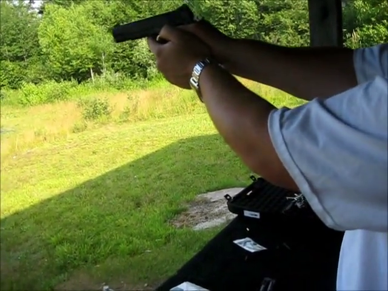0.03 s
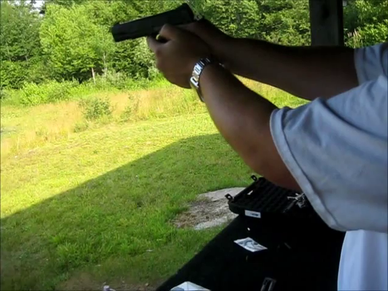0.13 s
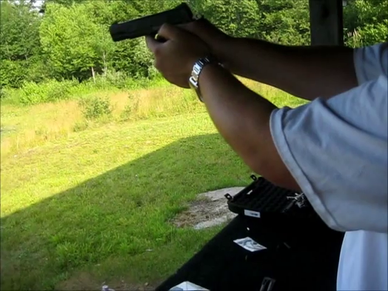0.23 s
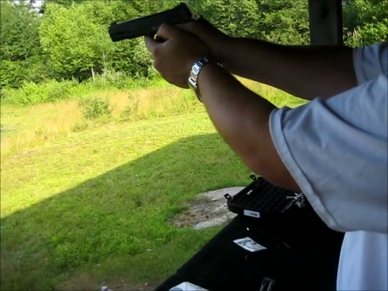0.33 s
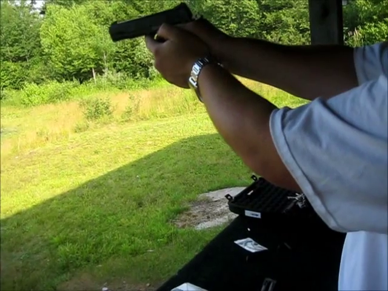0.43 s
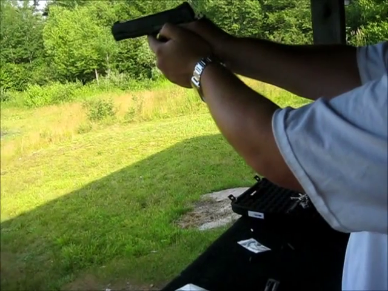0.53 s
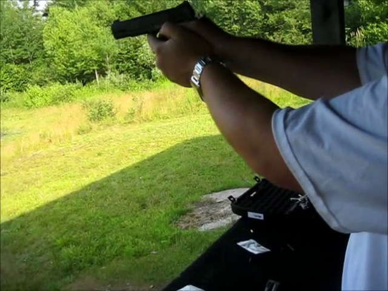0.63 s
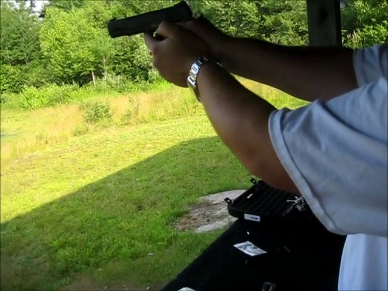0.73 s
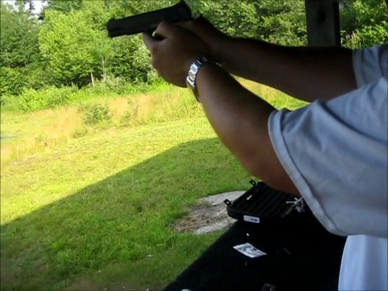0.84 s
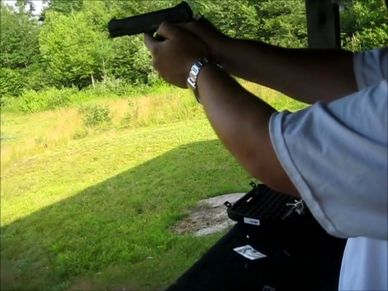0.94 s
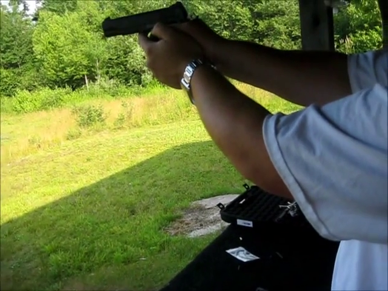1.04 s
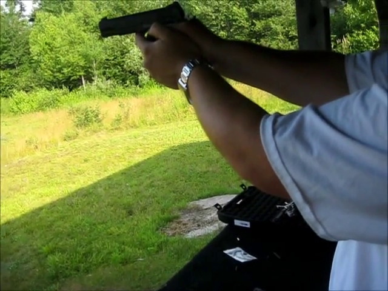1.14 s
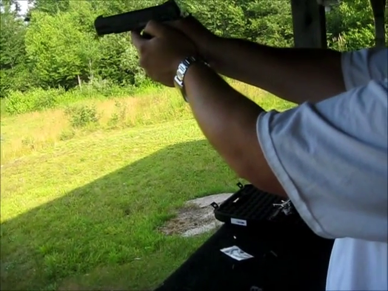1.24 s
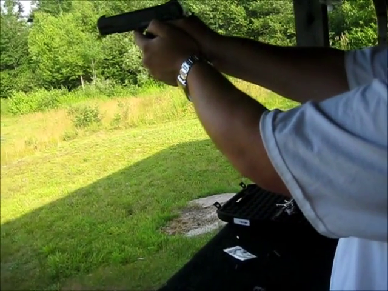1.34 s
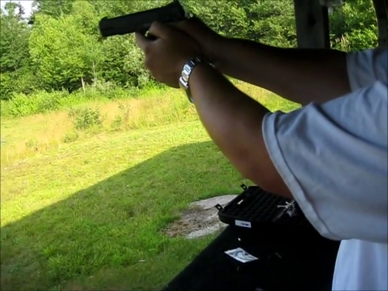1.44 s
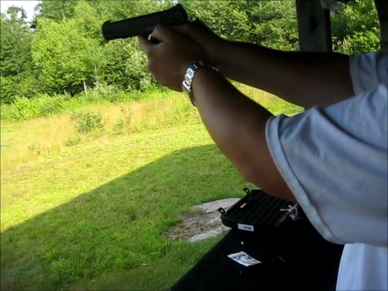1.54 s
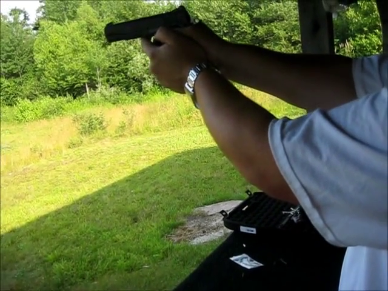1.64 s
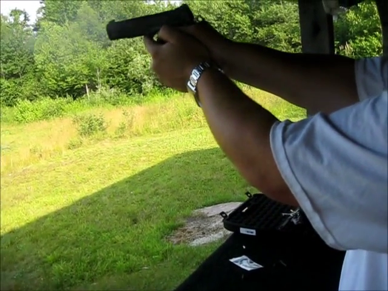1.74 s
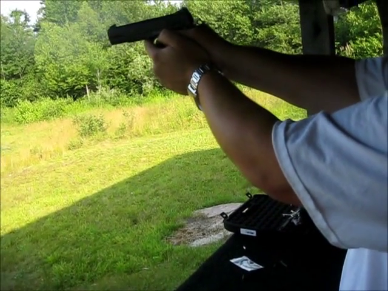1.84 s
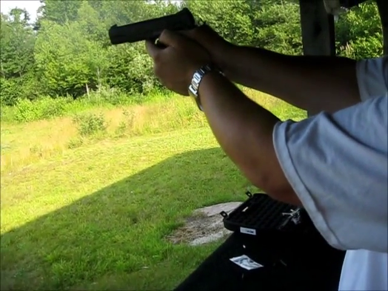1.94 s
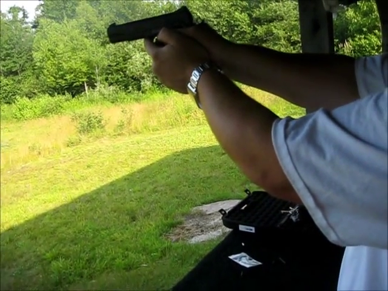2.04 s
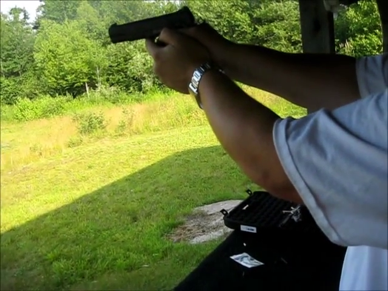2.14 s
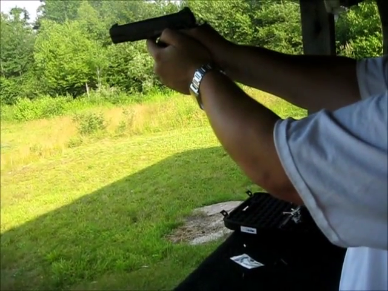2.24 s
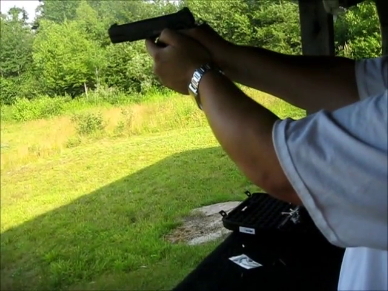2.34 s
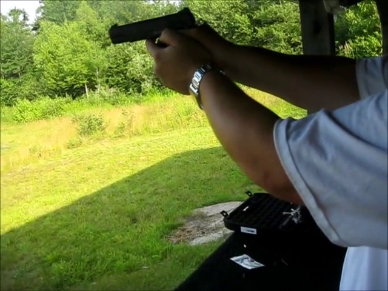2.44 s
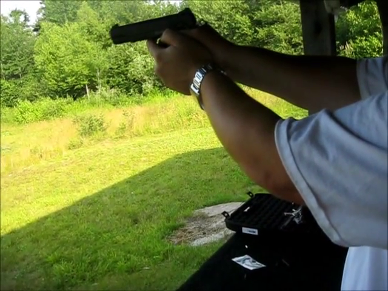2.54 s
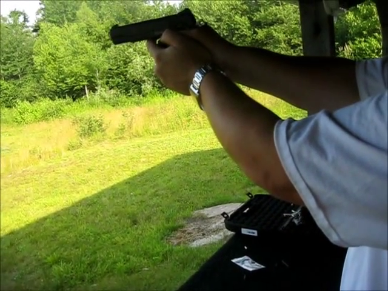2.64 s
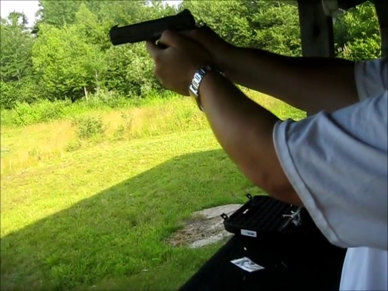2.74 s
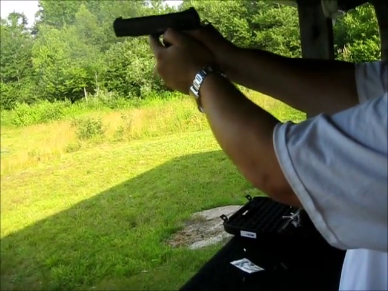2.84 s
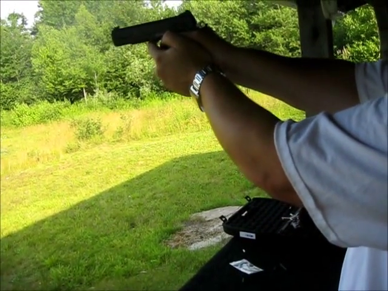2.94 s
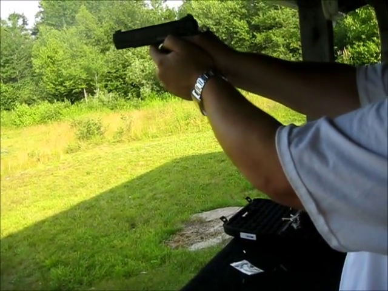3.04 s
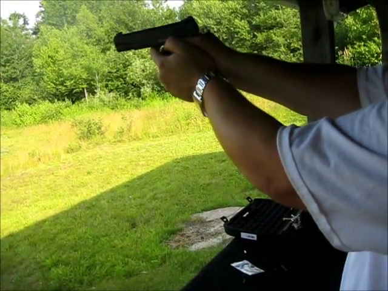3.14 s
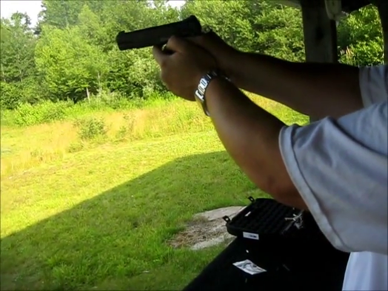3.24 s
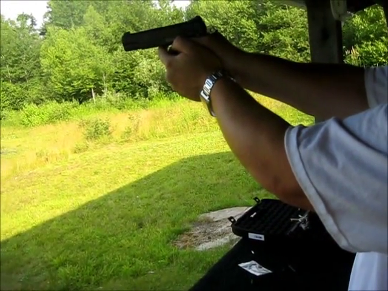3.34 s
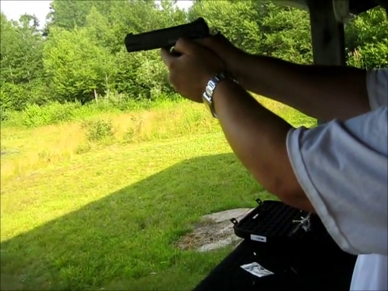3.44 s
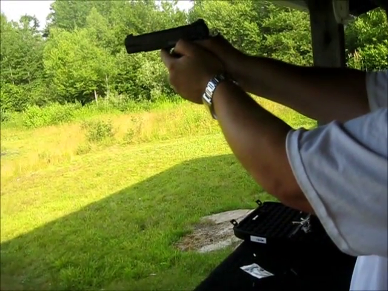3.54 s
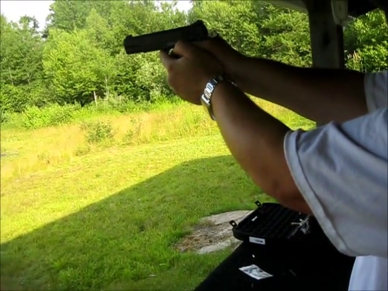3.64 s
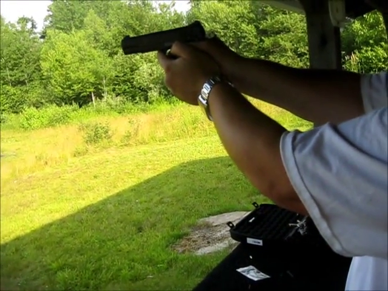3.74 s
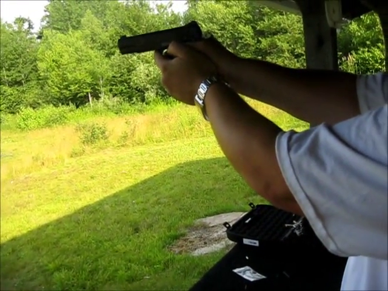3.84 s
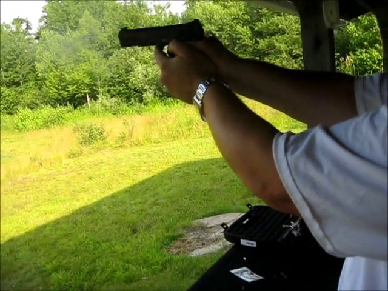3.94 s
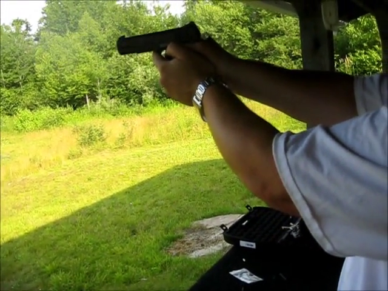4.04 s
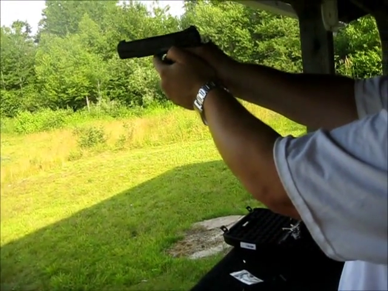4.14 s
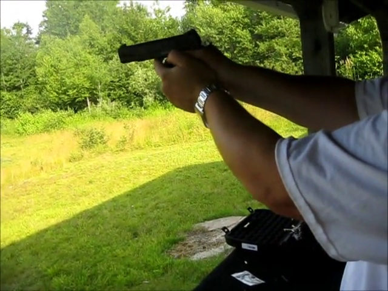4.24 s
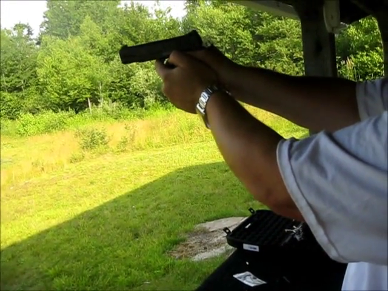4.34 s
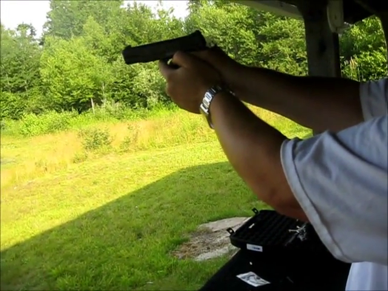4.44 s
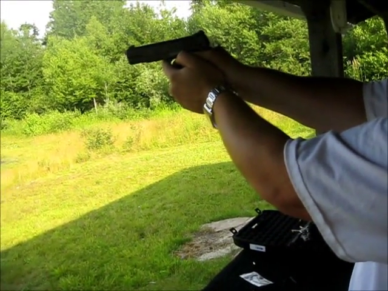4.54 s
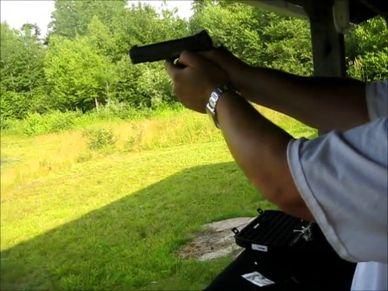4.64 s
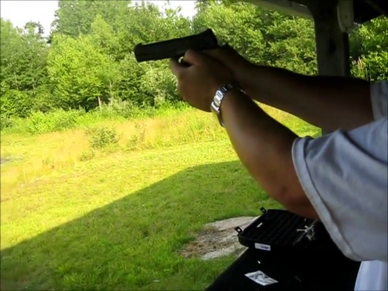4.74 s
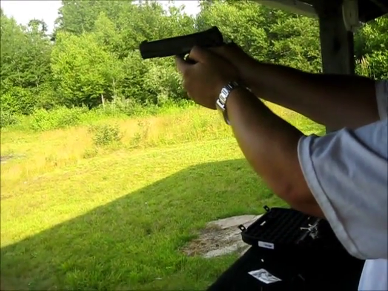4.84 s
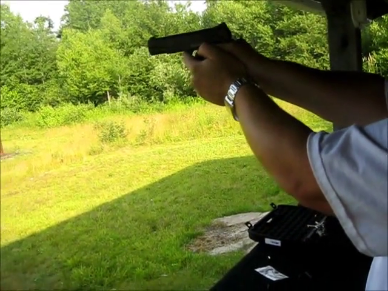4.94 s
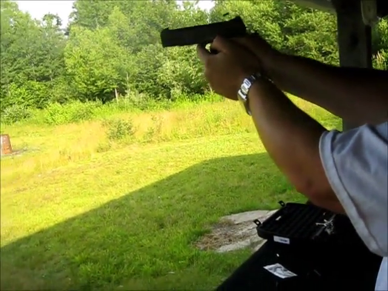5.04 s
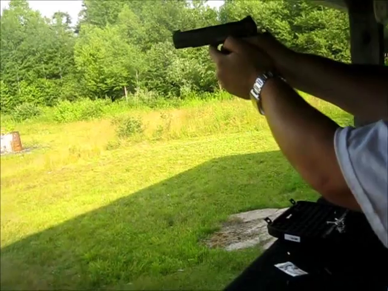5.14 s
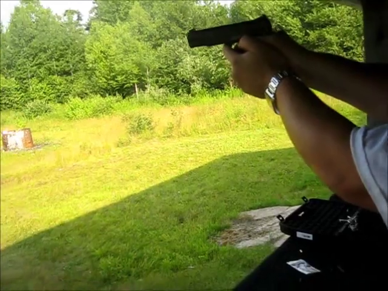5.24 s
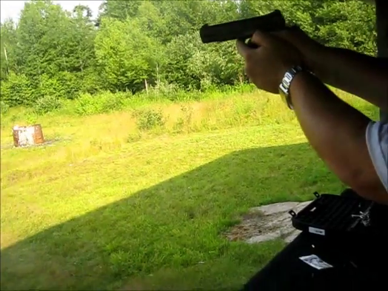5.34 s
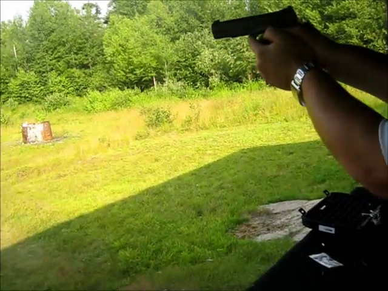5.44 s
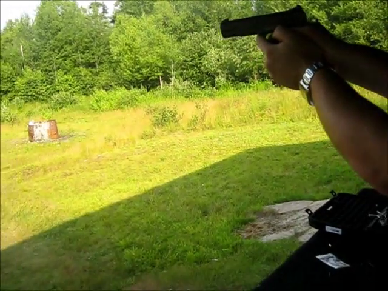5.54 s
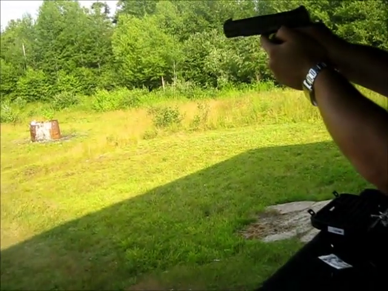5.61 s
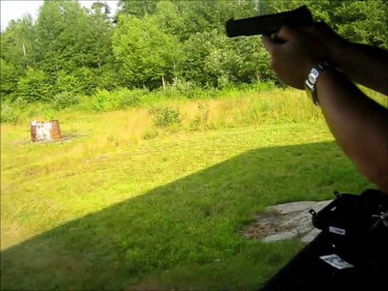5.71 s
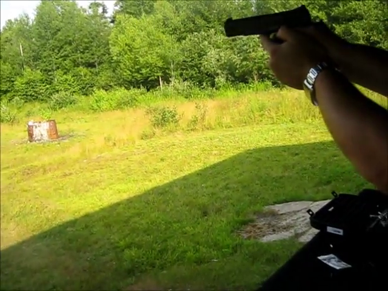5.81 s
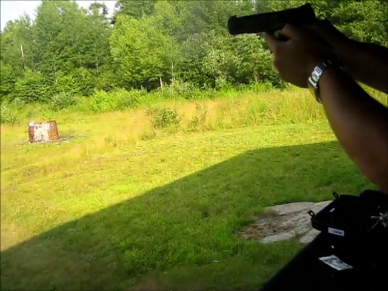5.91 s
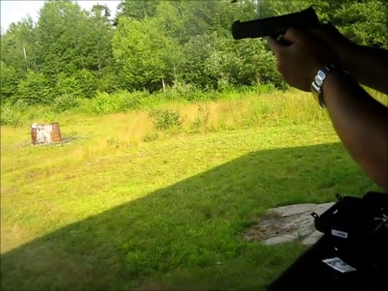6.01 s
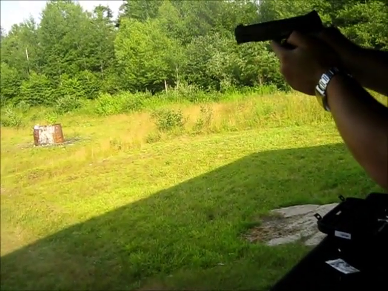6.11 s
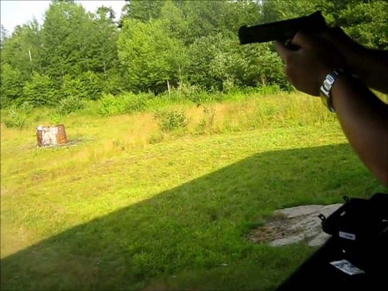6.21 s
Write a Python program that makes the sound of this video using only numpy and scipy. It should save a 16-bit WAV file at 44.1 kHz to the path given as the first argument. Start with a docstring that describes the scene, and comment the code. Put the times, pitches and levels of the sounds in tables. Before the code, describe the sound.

A small pistol fires five evenly paced shots close by outdoors, with a rolling echo, trigger clicks and tinkling shell casings.

```python
"""A small pistol fires five shots under the roof of a range shelter, close to a camera microphone.
Each crack fills the shelter and sets a panel humming; the camera's gain control ducks, and the echo
of the woods beyond swells as it recovers. The trigger and hammer click just before each shot.
Between shots spent brass cases land on the floor, bounce and ring, over a faint outdoor hiss."""
import sys
import numpy as np
from scipy import signal
from scipy.fft import rfft, irfft, next_fast_len
from scipy.io import wavfile
from scipy.ndimage import uniform_filter1d

SR = 44100
rng = np.random.default_rng(int(sys.argv[2]) if len(sys.argv) > 2 else 0)


def generate_wav(sig):
    """Save sig (samples, or channels by samples) to the path in sys.argv[1] as 16-bit PCM at SR."""
    pcm = np.round(np.clip(np.atleast_2d(sig).T, -1, 1) * 32767).astype(np.int16)
    wavfile.write(sys.argv[1], SR, pcm)


N = 276507


def amp(db):
    """Decibels to amplitude."""
    return 10 ** (np.asarray(db) / 20)


def unit_rms(x):
    """Scales to an rms of one."""
    return x / np.sqrt(np.mean(x ** 2) + 1e-20)


def clock(seconds):
    """Sample times of a sound of that length."""
    return np.arange(round(seconds * SR)) / SR


def decay(t, t60):
    """Exponential fall of 60 dB in t60 seconds."""
    return np.exp(-np.log(1000) * t / t60)


def add(mix, start_s, sound):
    """Lays a sound into the mix."""
    part = mix[round(start_s * SR):][:len(sound)]
    part += sound[:len(part)]


def spectrum_db(spectrum, hz):
    """Reads a spectrum table along a logarithmic frequency axis."""
    table_hz, db = np.transpose(spectrum)
    return np.interp(np.log(hz + 1), np.log(table_hz + 1), db)


def coloured(x, spectrum, peaks=()):
    """Gives x a spectrum, with resonance peaks on top, at an rms of one."""
    size = next_fast_len(len(x))
    hz = np.fft.rfftfreq(size, 1 / SR)
    peaks_db = sum(lift / (1 + (2 * (hz - centre) / width) ** 2) for centre, width, lift in peaks)
    gain = amp(spectrum_db(spectrum, hz) + peaks_db)
    return unit_rms(irfft(rfft(x, size) * gain, size)[:len(x)])


def band_noise(t, hz, width_hz):
    """Noise in one resonance."""
    b, a = signal.iirpeak(hz, hz / width_hz, SR)
    return unit_rms(signal.lfilter(b, a, rng.standard_normal(len(t))))


def stirred(paths, steady_below_hz):
    """The same echo paths answer every shot; moving air reshuffles the short waves."""
    kept = 1 / (1 + (np.fft.rfftfreq(len(paths), 1 / SR) / steady_below_hz) ** 2)
    fresh = rfft(rng.standard_normal(len(paths)))
    return irfft(kept * rfft(paths) + np.sqrt(1 - kept ** 2) * fresh, len(paths))


# Open air around the shelter: frequency_hz, relative_db
AIR_SPECTRUM = [(15, -37), (25, -16.5), (129, -7), (233, -6.5), (509, -5), (552, -5), (684, -4.5),
                (782, -3.5), (1800, -7.5), (2360, -8.5), (5730, -11), (7910, -18.5), (9300, -18),
                (15500, -24.5)]
def outdoor_air(level_db=-49.5):
    """A faint, steady hiss behind everything."""
    return amp(level_db) * coloured(rng.standard_normal(N), AIR_SPECTRUM)


# Cases striking the shelter floor: start_s, level_db
CASE_LANDINGS = [(2.134, -34), (2.362, -45.5), (3.33, -29), (3.347, -30), (4.431, -31), (4.446, -32),
                 (5.157, -32.5), (5.5, -24.5), (5.7512, -25.5)]
def case_landings(mix):
    """Each landing is a bright tick of brass, with a short tail under the roof."""
    t = clock(.2)
    tick_hz_db = [(1000, -35.5), (4000, -17.5), (5800, 13), (7500, 0.5), (12000, 3.5), (16000, -9)]
    onset = np.minimum(t / 0.00086, 1)
    envelope = onset * (decay(t, t60=0.0412) + amp(-12) * decay(t, t60=0.533))
    for start_s, level_db in CASE_LANDINGS:
        tick = coloured(rng.standard_normal(len(t)), tick_hz_db)
        add(mix, start_s, amp(level_db) * tick * envelope)


def case_ring(wall_hz, wall_db, cavity_hz, cavity_db):
    """The thin wall rings in a beating pair of modes; the air inside gives a short, breathy note."""
    t = clock(0.38)
    beat_hz = rng.uniform(19.8, 60.3)
    modes = np.sin(2 * np.pi * wall_hz * t) + 0.66 * np.sin(2 * np.pi * (wall_hz + beat_hz) * t)
    wall = unit_rms(modes + .6 * band_noise(t, wall_hz, width_hz=89)) * decay(t, t60=0.191)
    cavity = band_noise(t, cavity_hz, width_hz=290) * decay(t, t60=0.147)
    onset = np.minimum(t / 0.0066, 1)
    return (amp(wall_db) * wall + amp(cavity_db) * cavity) * onset


# The wall note of each case on the floor: from_s, pitch_hz
CASE_PITCHES = [(2.3, 12220), (4.2, 12500), (5.3, 12470)]
# Knocks that set a case bouncing: start_s, wall_db, cavity_db, cavity_hz, first_flight_s
CASE_KNOCKS = [(2.360, -38.5, -23.5, 5810, 0.1795), (2.735, -42.5, -34, 5590, .1),
               (4.290, -43, -55, 5600, 0.236), (4.555, -37.5, -48.5, 5460, .08),
               (5.347, -37.5, -48.5, 5613, .155), (5.75, -31, -49.5, 5600, 0.13)]
def bouncing_cases(mix, wall_loss_db=9, cavity_loss_db=16, cavity_sag=0.062, flight_share=.67):
    """A case rings at four touches of the floor; each hop is shorter and softer, its air note lower."""
    for start_s, wall_db, cavity_db, cavity_hz, first_flight_s in CASE_KNOCKS:
        wall_hz = [hz for from_s, hz in CASE_PITCHES if from_s <= start_s][-1]
        touch_s = start_s
        for hop in range(4):
            spent = np.sqrt(hop)  # the first bounce loses most
            ring = case_ring(wall_hz, wall_db - spent * wall_loss_db,
                             cavity_hz * (1 - cavity_sag) ** hop, cavity_db - spent * cavity_loss_db)
            add(mix, touch_s, ring)
            touch_s += first_flight_s * flight_share ** hop


def steel_click(level_db, body_db):
    """Small steel parts snap together; body_db sets the frame's ring against the bright snap."""
    t = clock(.08)
    snap = band_noise(t, hz=11000, width_hz=9800) * decay(t, t60=0.0485)
    body = band_noise(t, hz=2210, width_hz=350) + 0.51 * band_noise(t, hz=4600, width_hz=1900)
    share = amp(body_db) / 2
    return amp(level_db) * (snap + share * body * decay(t, t60=0.0417)) / np.hypot(1, share)


# The trigger, close to the microphone: start_s, take_up_db, release_db, body_db
TRIGGER_PULLS = [(1.618, -62, -32, 10.5), (2.7535, -44, -39.5, -9.5), (3.859, -39.5, -37, 2.5),
                 (4.888, -45.5, -44.5, -10), (5.8095, -43.5, -35, 14)]
def trigger_pulls(mix, release_lag_s=.0168):
    """Each pull clicks twice: the take-up, then the release."""
    for start_s, take_up_db, release_db, body_db in TRIGGER_PULLS:
        add(mix, start_s, steel_click(take_up_db, body_db))
        add(mix, start_s + release_lag_s, steel_click(release_db, body_db))


# Clumps of trunks out in the woods, louder than the diffuse echo: delay_s, lift_db, spread_s
TRUNK_CLUMPS = [(0.249, 4, 0.0054), (0.304, 4.5, 0.00226), (.415, 4, 0.0155), (0.479, 3.5, .003),
                (.564, 1.5, .0016), (0.605, 8, 0.00193), (0.683, 5, 0.00306)]
def trees():
    """A dense thicket of paths back to the microphone, in which a few clumps stand out."""
    t = clock(2)
    lift_db = sum(db * np.exp(-.5 * ((t - delay) / spread) ** 2) for delay, db, spread in TRUNK_CLUMPS)
    return rng.standard_normal(len(t)) * amp(lift_db)


# Colour of the nearest trees: frequency_hz, relative_db
NEAR_TREES_SPECTRUM = [(50, -28), (180, -30.5), (340, -20), (450, -9), (650, -7), (830, 0.5), (1070, 2),
                       (1300, -2), (1650, -6.5), (3200, -4.5), (5500, -10), (7200, -14), (10500, -18.5),
                       (15500, -26)]
# What air and foliage do to a distant echo for every far_s of travel: frequency_hz, gain_db
FOLIAGE_LOSS = [(100, -19.5), (330, -2.5), (500, 3), (950, 1.5), (1350, -6), (2200, -8.5), (3200, -18.5),
                (5500, -22.5), (10000, -33.5), (15500, -46)]
def woods_echo(paths, deep_db=-14, far_s=0.88, swell_s=0.3926, fade_from_s=0.5592,
               treeline_db=-24, treeline_s=0.293, spread_s=0.0374, surge_db=1.07, surge_s=0.03004):
    """Countless trees scatter the shot; the farther they stand, the later and duller their answer."""
    scattered = coloured(stirred(paths, steady_below_hz=2700), NEAR_TREES_SPECTRUM)
    hz, t, bands = signal.stft(scattered, SR, nperseg=512)
    swell = np.minimum(t / swell_s, 1) ** 0.446  # the shot reaches more and more trees
    fade = decay(np.maximum(t - fade_from_s, 0), t60=2.016)
    travel_db = spectrum_db(FOLIAGE_LOSS, hz)[:, None] * t / far_s
    deep_woods = amp(deep_db + travel_db) * swell * fade
    # The open edge of the woods answers early and undulled.
    treeline = amp(treeline_db) * np.exp(-.5 * ((t - treeline_s) / spread_s) ** 2)
    surges = amp(surge_db * np.interp(t / surge_s, np.arange(len(t)), rng.standard_normal(len(t))))
    return signal.istft(bands * np.hypot(deep_woods, treeline) * surges, SR, nperseg=512)[1]


def panel_hum(pitch_hz=298, level_db=-24, rattle=0.362):
    """A panel of the shelter hums on unevenly after the blast."""
    t = clock(0.92)
    hum = np.sin(2 * np.pi * pitch_hz * t) + rattle * band_noise(t, pitch_hz, width_hz=9)
    return amp(level_db) * hum * decay(t, t60=0.824)


# The blast thrown around under the roof: frequency_hz, relative_db
BLAST_SPECTRUM = [(40, -35.5), (100, -31), (200, -14.5), (400, -9), (620, -5.5), (1350, -3), (1950, -9.5),
                  (3600, -5), (5900, -13), (7900, -18.5), (10000, -17.5), (15500, -23)]
# Resonances of the shelter around the microphone: pitch_hz, width_hz, lift_db
SHELTER_MODES = [(566.3, 43, 5), (721.5, 109, 4), (1011, 145, 3.5), (1160, 21, -3), (1389, 67, 2),
                 (1762, 82, 9), (2506, 257, 5), (2640, 43, 4), (2720, 41, -1), (3070, 37, 1),
                 (3570, 205, 3.5), (3810, 113, 0.5), (4210, 60, -3), (4197, 50, 4), (4600, 41, -8.5),
                 (5480, 61, 5.5), (6004, 144, 6)]
def shelter_reverb(paths, arrival_s=0.005254, early_db=18, late_db=11):
    """Roof and bench return the blast a moment later; it dies fast through the open sides."""
    t = np.arange(len(paths)) / SR
    age = np.maximum(t - arrival_s, 0)
    onset = np.minimum(t / arrival_s, 1) ** 3
    level = np.hypot(amp(early_db) * decay(age, t60=0.069), amp(late_db) * decay(age, t60=0.1787))
    blast = coloured(stirred(paths, steady_below_hz=4680), BLAST_SPECTRUM, SHELTER_MODES)
    return blast * level * onset


def gas_thump(gain_db, push_s):
    """The muzzle gas pushes, then sucks back."""
    age = clock(.1) / push_s
    return amp(gain_db) * (1 - age) * np.exp(-age) * (1 - np.exp(-4 * age))


# The report, straight from muzzle to microphone: frequency_hz, relative_db
CRACK_SPECTRUM = [(40, -37), (150, 1), (500, -14.5), (1000, 3), (2500, 4.5), (6000, 4), (9000, 0),
                  (11300, 3.5), (13500, -1.5), (16000, -2)]
def muzzle_crack(level_db=14.5, hold_s=0.00435):
    """A few milliseconds of harsh, bright noise."""
    t = clock(.1)
    envelope = decay(np.maximum(t - hold_s, 0), t60=0.031)
    return amp(level_db) * coloured(rng.standard_normal(len(t)), CRACK_SPECTRUM) * envelope


# The pistol under the roof, at close range: start_s, blast_gain_db, thump_gain_db, push_s
PISTOL_SHOTS = [(1.6686, 0, -9, 0.00046), (2.803, 0, 13, 0.001125), (3.9077, -0.5, 11, 0.00266),
                (4.9776, -0.5, 16, 0.00104), (5.8396, 0, -2, 0.00054)]
def pistol_shots(mix, hammer_lead_s=0.0093):
    """The hammer falls, the muzzle cracks and thumps, and the shelter and woods answer."""
    shelter_paths, tree_paths = rng.standard_normal(SR // 2), trees()
    for start_s, blast_gain_db, thump_gain_db, push_s in PISTOL_SHOTS:
        add(mix, start_s - hammer_lead_s, steel_click(level_db=-30.5, body_db=1.5))
        for part in muzzle_crack(), shelter_reverb(shelter_paths), panel_hum(), woods_echo(tree_paths):
            add(mix, start_s, amp(blast_gain_db) * part)
        add(mix, start_s, gas_thump(thump_gain_db, push_s))


def scene():
    """Five shots with their echoes, the small metal sounds and the outdoor hiss, in mono."""
    mix = outdoor_air()
    pistol_shots(mix)
    trigger_pulls(mix)
    case_landings(mix)
    bouncing_cases(mix)
    return mix[None]


def gain_control(x, threshold_db=-8, cut_share=0.8623, recovery_db_per_s=95):
    """The camera's gain drops at once on a loud sound and creeps back."""
    power_db = 10 * np.log10(abs(uniform_filter1d(x ** 2, size=280)) + 1e-12)
    cut_db = cut_share * np.maximum(power_db - threshold_db, 0)
    recovered_db = np.arange(N) / SR * recovery_db_per_s
    held_cut_db = np.maximum.accumulate(cut_db + recovered_db) - recovered_db
    return x / amp(uniform_filter1d(held_cut_db, size=40))


def record(dry, notch_hz=7930, notch_width_hz=1300, band_limit_hz=16050):
    """Gain control, a notch in the treble, clipping at full scale and a band limit."""
    notch = signal.iirnotch(notch_hz, notch_hz / notch_width_hz, SR)
    notched = signal.lfilter(*notch, gain_control(dry[0]))
    low_pass = signal.firwin(401, band_limit_hz, window=("kaiser", 8), fs=SR)
    return signal.oaconvolve(np.clip(notched, -1, 1), low_pass, "same")[None]


dry = scene()
out = record(dry)
generate_wav(out)
```